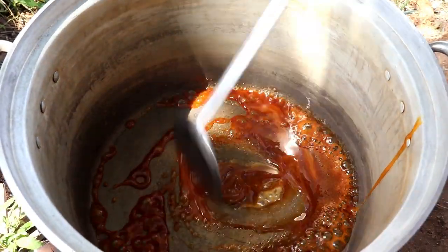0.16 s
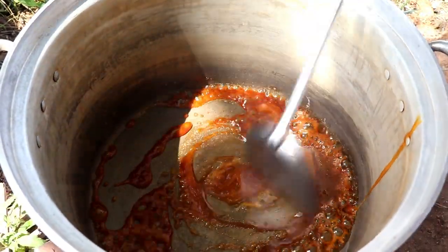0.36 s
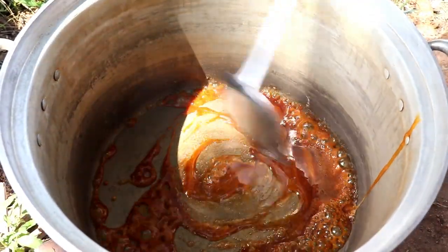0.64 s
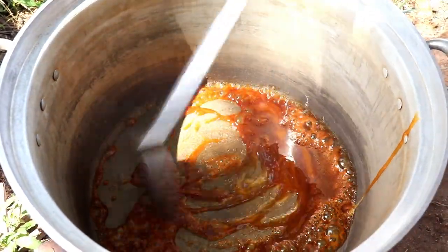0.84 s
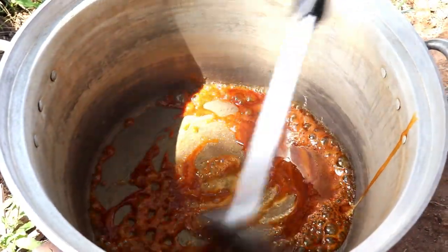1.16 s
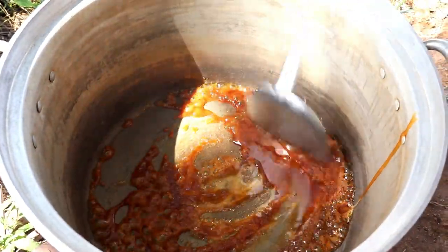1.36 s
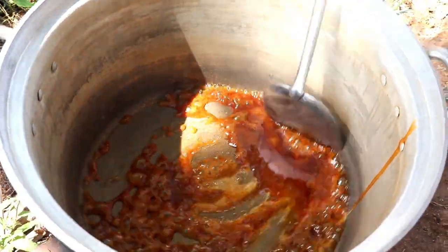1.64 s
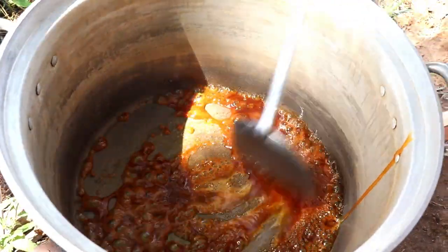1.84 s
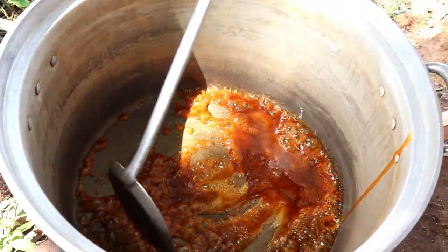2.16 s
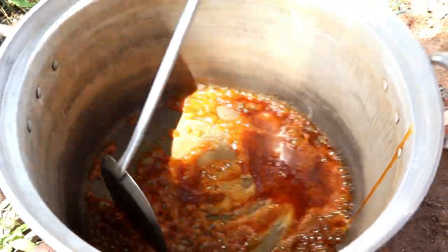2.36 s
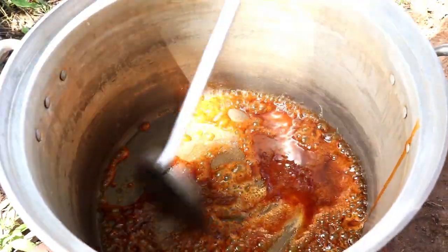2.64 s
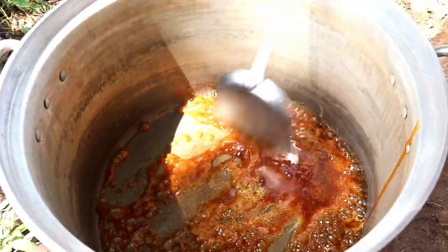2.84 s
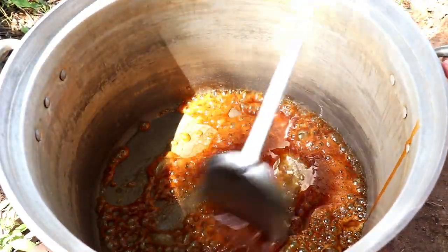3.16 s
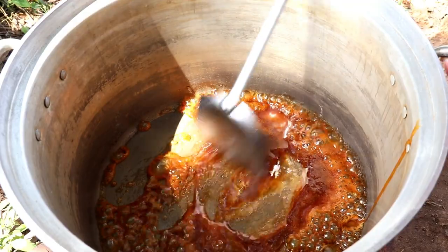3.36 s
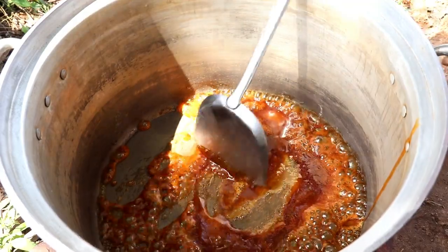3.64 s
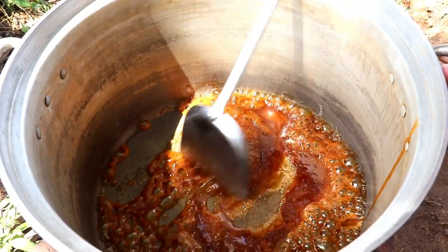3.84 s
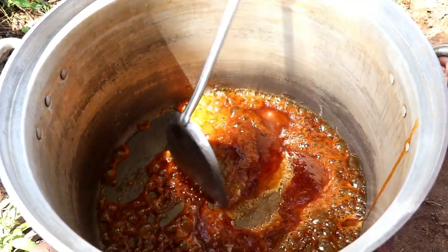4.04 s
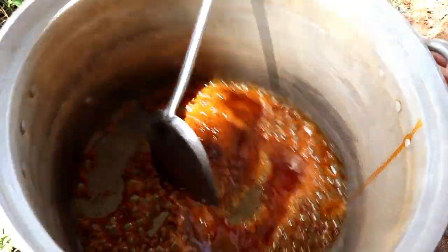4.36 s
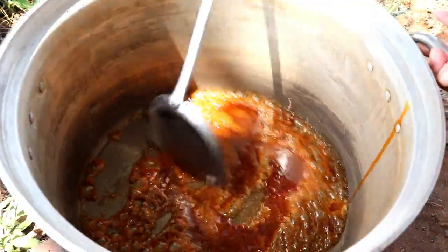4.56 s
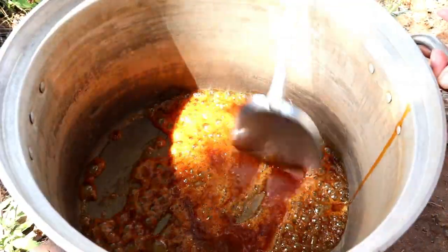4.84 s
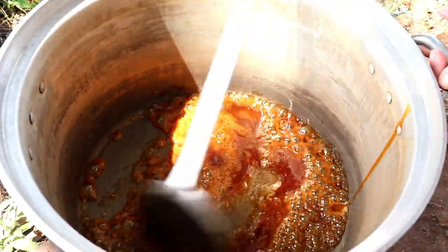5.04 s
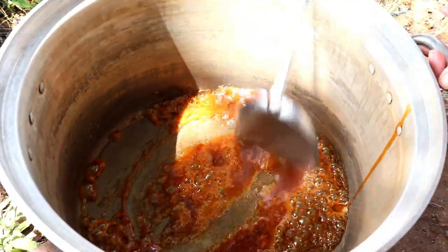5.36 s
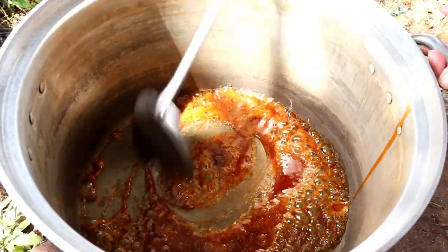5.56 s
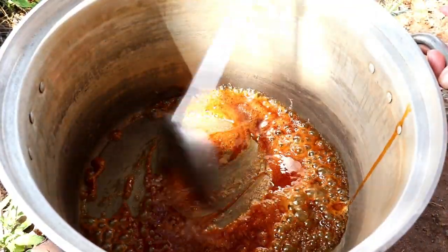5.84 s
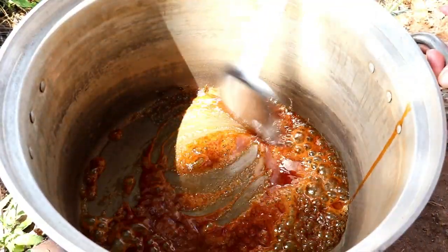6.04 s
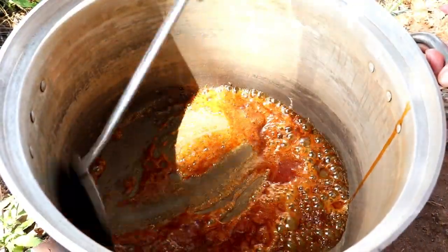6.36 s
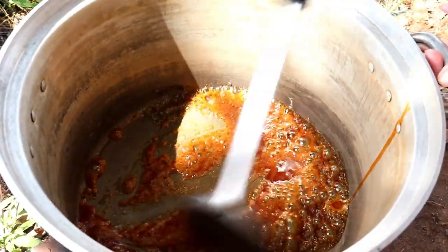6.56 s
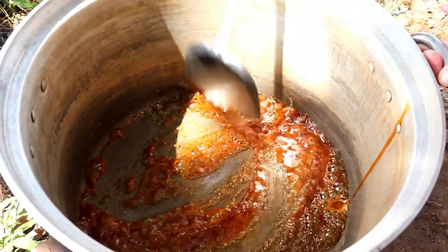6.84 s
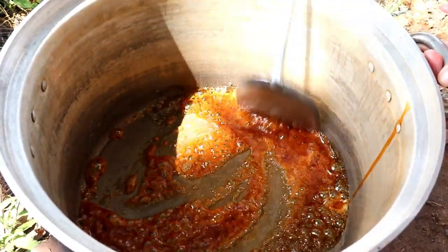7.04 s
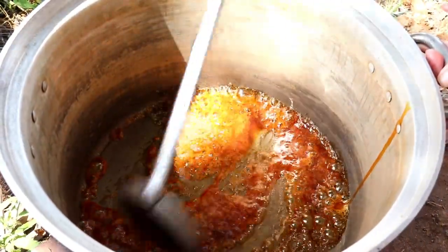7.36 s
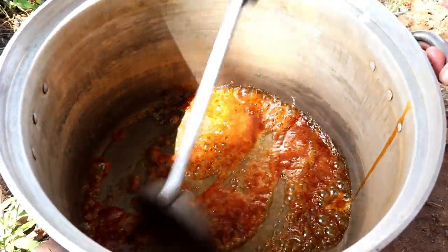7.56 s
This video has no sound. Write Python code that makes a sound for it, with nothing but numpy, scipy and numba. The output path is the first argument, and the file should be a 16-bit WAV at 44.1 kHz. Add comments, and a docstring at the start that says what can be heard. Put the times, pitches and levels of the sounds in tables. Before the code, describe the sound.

Close up and outdoors, a metal ladle scrapes round a big metal pot in quick, uneven strokes, two or three a second, knocking on the bottom and wall as it goes. The scrapes are raspy and slightly squeaky with a hollow groan beneath, and the hardest blows briefly overload the small microphone. Underneath, hot syrup sizzles and simmers, strongest at the start and slowly dying down, while light wind touches the microphone.

```python
"""A steel ladle stirs sizzling sugar syrup in a wide aluminium pot, outdoors, heard from close by.
Its edge scrapes the bottom in short strokes and knocks on bottom and wall; the pot booms and rings.
Underneath, tiny bursting bubbles hiss, larger ones colour the hiss and thick ones simmer low.
The small microphone stands in light wind, turns itself down after loud moments
and overloads on the hardest blows."""
import sys
import numpy as np
from scipy import signal
from scipy.fft import rfft, irfft, next_fast_len
from scipy.io import wavfile
from scipy.ndimage import uniform_filter1d
from numba import njit

SR = 44100
rng = np.random.default_rng(int(sys.argv[2]) if len(sys.argv) > 2 else 0)


def dump(signal):
    """Clip the signal to [-1, 1] and save it as 16-bit WAV at the path in sys.argv[1]."""
    limited = np.clip(np.atleast_2d(signal).T, -1, 1)
    pcm = np.round(limited * 32767).astype(np.int16)
    wavfile.write(sys.argv[1], SR, pcm)


N = 339129

# light wind on the microphone: t/s, level/dB
GUSTS = [(0.0, -46), (0.21, -44), (2.48, -39), (2.74, -43), (3.1, -36), (3.51, -45), (4.05, -43),
         (4.22, -41), (5.01, -38), (5.7, -51), (6.83, -41.5), (7.69, -40)]
# the syrup dying down: t/s, sizzle/dB, larger bubbles/dB, low simmer/dB
SYRUP_LEVELS = [(0, -26, -30.5, -32), (1.5, -28, -32, -36), (2.4, -31, -35, -40), (3.3, -31.5, -34, -35),
                (4.5, -34.5, -35, -37), (6, -34.5, -37, -41), (7.7, -35.5, -50, -40.5)]
# spectra of wind, syrup and the rasping edge: f/Hz, relative level/dB per Hz
WIND_SPECTRUM = [(12, -25), (25, -8), (60, 0.5), (110, -9.5), (150, -22), (250, -40)]
SIZZLE_SPECTRUM = [(260, -39), (450, -13), (589, -13), (616, -19), (843, -3.5), (908, -11), (950, -11.5),
                   (1220, -12.5), (1700, -6), (2160, -6.5), (4300, -6.5), (6060, -10.5), (9070, -12),
                   (16000, -31.5)]
BUBBLE_SPECTRUM = [(700, -24), (1100, -3), (1350, 0), (1750, -0.5), (2100, -18), (3000, -17)]
SIMMER_SPECTRUM = [(60, -21), (110, -2), (259, 0.5), (299, 5.5), (381, -2.5), (426, -4), (600, -8.5),
                   (780, -41), (1000, -80)]
RASP_SPECTRUM = [(650, -38), (1100, -6.5), (1570, -11.5), (1970, 0.5), (2760, -6), (3610, -3), (4080, 6),
                 (4940, 0), (5400, 4.5), (6110, -3), (8450, -6), (14100, -24), (16000, -66)]
# modes of the syrup-damped bottom, wall, ladle blade and free rim: f/Hz, relative level/dB, t60/s
BOTTOM_MODES = [(135, 0.5, 0.082), (186.4, -8, 0.2), (213.5, -5.5, 0.17), (244, 4, 0.09), (304.7, -2, 0.1),
                (348, 4.5, 0.089), (417.6, -1, 0.072)]
WALL_MODES = [(853, -29, 0.14), (838.6, 8, 0.038), (983, 10, 0.024), (1217, -3, 0.048),
              (1407, 19.5, 0.0079)]
BLADE_MODES = [(1662, -2.5, 0.029), (1808, 0, 0.027), (2066, -23, 0.0085), (2510, -9.5, 0.017),
               (2600, -28, 0.0083), (2848, -5, 0.056), (3306, 5.5, 0.011), (3550, -12, 0.021),
               (3997, -4, 0.038), (4240, -24, 0.067), (4560, -3, 0.066), (4796, -2.5, 0.075),
               (5280, -7.5, 0.085), (5476, -5.5, 0.052), (6400, -18, 0.018), (7070, -6.5, 0.067),
               (7690, -10.5, 0.027), (8260, -12.5, 0.11), (10700, -23, 0.014), (12600, -28, 0.014)]
RIM_MODES = [(764, -6.5, 0.59), (792, -16, 0.4), (817, -11.5, 0.7), (867, -18, 0.64), (1720, -16, 0.53)]
# strokes of the edge over the bottom, one curve each: t/s, rasp/dB, boom/dB
STROKES = [
    [(0.03, -48, -30), (0.084, -20.5, -18.5), (0.114, -41, -36), (0.154, -19.5, -20), (0.166, -35, -28),
     (0.228, -22.5, -9.5), (0.255, -40, -36)],
    [(0.255, -33, -31), (0.285, -13.5, -17), (0.311, -14.5, -20), (0.355, -26, -15.5), (0.409, -16, -20.5),
     (0.443, -15.5, -28), (0.465, -42, -31)],
    [(0.47, -35, -21), (0.49, -18.5, -19.5), (0.518, -33, -33), (0.538, -16.5, -16), (0.55, -38, -24),
     (0.606, -26.5, -32), (0.62, -33, -19)],
    [(0.66, -37, -23), (0.67, -22.5, -11), (0.684, -17.5, -22), (0.694, -30.5, -17.5), (0.746, -20.5, -22),
     (0.768, -27, -19.5), (0.79, -33, -22)],
    [(1.06, -25, -22), (1.084, -32, -28), (1.106, -24, -12), (1.17, -22.5, -7.5), (1.236, -9, -29),
     (1.29, -20.5, -21), (1.3, -54, -46)],
    [(1.6, -21, -10), (1.62, -32, -11), (1.628, -33.5, -21), (1.734, -29, -10.5), (1.754, -22, -15),
     (1.77, -25, -11)],
    [(2.32, -39, -36), (2.338, -29.5, -29), (2.378, -34.5, -21), (2.494, -29, -6.5), (2.522, -56, -4.5),
     (2.58, -48, -43)],
    [(2.66, -52, -28), (2.682, -27, -28), (2.714, -20, -11), (2.722, -23.5, -16.5), (2.772, -45, -39),
     (2.78, -37.5, -42)],
    [(3.14, -21.5, -23), (3.174, -14, -19), (3.19, -39, -28), (3.198, -39, -33), (3.234, -31, -22.5),
     (3.27, -38, -37)],
    [(3.46, -45, -13), (3.53, -37.5, -42), (3.562, -32, -16.5), (3.612, -34, -25), (3.622, -27, -20),
     (3.69, -32, -16)],
    [(3.72, -19, -8.5), (3.786, -49, -17), (3.818, -31, -8.5), (3.844, -42, -9.5), (3.98, -36, -22.5),
     (4.01, -44, -38)],
    [(4.2, -31.5, -16), (4.268, -33, -28.5), (4.296, -36, -19), (4.334, -32.5, -20.5), (4.476, -39, -18.5),
     (4.5, -44, -31)],
    [(5.0, -30.5, -22), (5.066, -18.5, -18), (5.092, -36.5, -22), (5.116, -21, -23), (5.13, -30.5, -17),
     (5.182, -20, -28), (5.188, -26, -32), (5.208, -22, -15.5), (5.255, -29, -30)],
    [(5.26, -33, -25), (5.27, -15.5, -25), (5.292, -28.5, -24), (5.348, -20.5, -30), (5.364, -30, -26),
     (5.386, -18.5, -23.5), (5.442, -14.5, -30), (5.498, -21.5, -16.5), (5.62, -23, -29)],
    [(5.62, -24, -29), (5.682, -23, -18.5), (5.726, -18, -37), (5.742, -33, -29), (5.776, -13, -23),
     (5.802, -16, -24), (5.82, -13, -33), (5.86, -24, -25), (5.93, -23.5, -30)],
    [(5.93, -33, -29), (5.94, -27, -33), (6.004, -23.5, -31), (6.036, -26, -23), (6.072, -19, -37),
     (6.098, -27, -27), (6.158, -14.5, -20), (6.208, -17, -36), (6.24, -27, -38)],
    [(6.25, -28, -23), (6.264, -16.5, -28), (6.3, -17, -28), (6.325, -42, -35)],
    [(6.43, -55, -33), (6.526, -17.5, -19.5), (6.618, -17, -25), (6.654, -22, -30), (6.678, -17.5, -37),
     (6.73, -16, -32.5), (6.762, -43, -27), (6.79, -33, -38)],
    [(7.14, -46, -19), (7.168, -15, -15), (7.188, -11, -24), (7.2, -35, -6)],
    [(7.43, -41, -39), (7.44, -45, -36), (7.506, -45, -28), (7.51, -37, -17)],
    [(7.55, -41, -12), (7.582, -12, -38), (7.64, -13.5, -24), (7.665, -60, -25)],
]
# the pot's answer to each stroke: groan at start/Hz, groan at end/Hz, wall gain/dB
STROKE_TONES = [(400, 430, -0.5), (387, 260, -5), (327.2, 350, -13), (198.3, 290, 2.5), (290, 330, -6.5),
                (240.35, 310, -4), (288.8, 305, -9), (299.4, 300, -4), (255.3, 290, -6.5), (242.3, 490, 0),
                (214.2, 250, 1), (213.2, 218, -3.5), (370, 500, -3.5), (246, 340, -8), (244.5, 420, -9.5),
                (281.5, 270, -7), (372.4, 340, -12), (360, 300, -12), (292, 220, -7), (268, 150, -12),
                (238, 240, -26)]
# ladle on pot, relative levels: t/s, thud/Hz, thud/dB, wall/dB, clank/dB, ring/dB
KNOCKS = [(0.14, 349, -7, -15, 3.5, -40), (0.482, 380, -11, -16, 8, -16), (0.531, 320, -13, -16, 8, -38),
          (0.574, 303, -28, -8.5, -3, -37), (0.634, 196, 1, 6, 2, -25), (0.682, 410, -9, 0.5, -17, -35),
          (1.022, 306, 1.5, -25, 0, -17), (1.287, 190, -8, 5, -25, -26), (1.564, 342, -5.5, -33, 15.5, -15),
          (1.593, 243, -0.5, -8, -17, -38), (1.775, 295, 18, 14, -19, -10), (2.3, 203, -13, -28, -4, -45),
          (2.612, 304, 7.5, 5, -32, -31), (2.713, 346, -7.5, 4.5, -26, -40),
          (3.029, 276, 16, 15.5, -15, -17), (3.141, 270, -3, -5, -9, -37),
          (3.227, 383, -5.5, -0.5, -21, -30), (3.437, 212, -1, -18, -10, -23),
          (3.627, 353, -10, -23, -13, -37), (3.7, 370, -0.5, 1, 20.5, -5.5),
          (3.821, 312, 6.5, -11, -28, -38), (4.2, 230, -12, -7, -22, -43),
          (4.606, 255.4, 18.5, 22.5, 12.5, 0), (4.856, 340, 0, 1, -40, -8), (4.912, 261, 13.5, 17, 2, -38),
          (4.99, 313, 2.5, -18, 4, -38), (5.179, 199, -11, 5, -23, -40), (5.205, 334, -8, 4, -31, -34),
          (5.271, 225, -15, -30, 6, -42), (5.288, 235, -11, 7.5, -19, -43),
          (5.617, 228, -41, -3.5, -3, -34), (5.656, 252, -25, 3, 2.2, -41), (5.677, 380, -11, 6, -22, -40),
          (5.763, 390, -22, 0, -11, -23), (5.97, 348, -28, 1, -20, -38), (5.988, 348, -27, -18, -17, -42),
          (6.018, 367.5, -16, -1.5, -3, -9), (6.161, 250, -19.5, -1, -10, -41),
          (6.259, 272, -11.5, -22, 0, -36), (6.375, 232, -13, -16, 18, -11),
          (6.403, 361, -1.5, -0.5, -12, -36), (6.597, 390, -10.5, 2, -1, -18),
          (7.096, 291, 9, 11.5, -24, -15), (7.21, 279, 11.5, -10, -26, -19),
          (7.527, 274, 14.5, -6, 16, -38), (7.64, 326, -5.5, -2.5, 11, -33)]


def from_db(db):
    """Gain of a level in dB."""
    return 10 ** (np.asarray(db) / 20)


def rms_one(x):
    """Scaled to rms 1."""
    return x / np.sqrt(np.mean(x ** 2) + 1e-20)


def drift(rate_hz, flicker_db=None):
    """Slow noise of spread 1; or, given a spread in dB, a flickering gain."""
    step, settle = 40, 2000    # samples per slow value; slow values dropped while the filter settles
    pole = np.exp(-2 * np.pi * rate_hz * step / SR)
    noise = rng.standard_normal(N // step + settle + 2)
    slow = rms_one(signal.lfilter([1], [1, -2 * pole, pole * pole], noise)[settle:])
    if flicker_db is not None:
        slow = from_db(flicker_db * slow)
    return np.interp(np.arange(N) / step, np.arange(len(slow)), slow)


def ring(clicks, hz, t60):
    """A unit click sets a decaying sine of height 1 ringing."""
    r, w = from_db(-60 / (t60 * SR)), 2 * np.pi * hz / SR
    return signal.lfilter([0, np.sin(w)], [1, -2 * r * np.cos(w), r * r], clicks + 1e-18)


def grains(per_s, spread_db):
    """Random clicks of very uneven size; rms 1."""
    sizes = from_db(spread_db * np.minimum(rng.exponential(1, N), 5)) * rng.choice([-1, 1], N)
    return rms_one(sizes * (rng.random(N) < per_s / SR))


def coloured(white, spectrum, patchy_db, rate_hz):
    """Shapes white input to a spectrum at equal power, then lets each half-octave band flicker."""
    hz, level_db = np.transpose(spectrum)
    size = next_fast_len(N)
    octave = np.log2(np.arange(1, size // 2 + 2) * SR / size)
    shape = from_db(np.interp(octave, np.log2(hz), level_db))
    shaped = rfft(white, size) * shape / np.sqrt(np.mean(shape ** 2))
    centres = np.arange(np.log2(hz[0]), np.log2(hz[-1]) + .5, .5)
    bands = (irfft(shaped * np.clip(1 - 2 * abs(octave - c), 0, 1), size)[:N] for c in centres)
    return sum(band * drift(rate_hz, flicker_db=patchy_db) for band in bands)


def driven(force, modes, wander_db):
    """A rough force shakes all modes; the contact point moves, so their shares wander."""
    power_gain = sum(from_db(2 * db) * t60 * SR / (4 * np.log(1000)) for hz, db, t60 in modes)
    ringing = sum(from_db(db) * ring(force * drift(10.5, flicker_db=wander_db), hz, t60)
                  for hz, db, t60 in modes)
    return ringing / np.sqrt(power_gain)


def knock_clicks(level_db):
    """One click at each knock, at the given levels."""
    clicks = np.zeros(N)
    clicks[(np.array(KNOCKS)[:, 0] * SR).astype(int)] = from_db(level_db)
    return clicks


def struck(level_db, modes, uneven_db=3.5):
    """Every knock strikes each mode with a strength of its own."""
    return sum(ring(knock_clicks(level_db + db + uneven_db * rng.standard_normal(len(KNOCKS))), hz, t60)
               for hz, db, t60 in modes)


def wind():
    """Lumpy low rumble right at the microphone port."""
    times, level_db = np.transpose(GUSTS)
    rumble = rms_one(coloured(rng.standard_normal(N), WIND_SPECTRUM, patchy_db=-5.5, rate_hz=6))
    return from_db(np.interp(np.arange(N) / SR, times, level_db)) * rumble


def syrup():
    """Thousands of tiny bursts a second merge into a hiss; larger bubbles colour it, thick ones simmer."""
    times, *levels_db = np.transpose(SYRUP_LEVELS)
    sizzle = coloured(grains(14000, spread_db=2.5), SIZZLE_SPECTRUM, patchy_db=2, rate_hz=8.6)
    bubbles = coloured(grains(2500, spread_db=4), BUBBLE_SPECTRUM, patchy_db=2.5, rate_hz=6.7)
    simmer = coloured(rng.standard_normal(N), SIMMER_SPECTRUM, patchy_db=2, rate_hz=5.8)
    return sum(from_db(np.interp(np.arange(N) / SR, times, db)) * layer
               for db, layer in zip(levels_db, (sizzle, bubbles, simmer)))


def strokes():
    """The edge lands, drags and lifts: envelopes of rasp, boom and wall force, and the groan's pitch."""
    edge_s = 0.0069    # time to land or lift
    rasp, boom, wall, pitch_hz = np.zeros((4, N))
    for curve, (first_hz, last_hz, wall_db) in zip(STROKES, STROKE_TONES):
        times, rasp_db, boom_db = np.transpose(curve)
        a, b = int(times[0] * SR), int(times[-1] * SR)
        t = np.arange(a, b) / SR
        contact = np.clip(np.minimum(t - times[0], times[-1] - t) / edge_s, 0, 1)
        rasp[a:b] = contact * from_db(np.interp(t, times, rasp_db))
        boom[a:b] = contact * from_db(np.interp(t, times, boom_db))
        wall[a:b] = from_db(wall_db) * rasp[a:b] ** .95
        pitch_hz[a:b] = np.linspace(first_hz, last_hz, b - a)
        pitch_hz[b:] = last_hz
    return rasp, boom, wall, pitch_hz


def squeak(grit):
    """The grit excites a resonance that shifts as the edge moves over the bottom."""
    centre_hz, width_hz, wander_octaves = 1600, 200, .22
    phase = 2 * np.pi * np.cumsum(centre_hz * 2 ** (wander_octaves * drift(6))) / SR
    pole = np.exp(-np.pi * width_hz / SR)
    envelope = signal.lfilter([np.sqrt(2 - 2 * pole * pole)], [1, -pole], grit * np.exp(-1j * phase))
    return np.real(envelope * np.exp(1j * phase))


def groan(boom, pitch_hz):
    """The rubbed bottom groans, a narrow unsteady tone: two slow noises in quadrature on a glide."""
    wavering_hz = pitch_hz * (1 + .03 * drift(9.6))
    phase = 2 * np.pi * np.cumsum(wavering_hz) / SR
    tone = (1.3 + drift(12)) * np.cos(phase) + drift(12) * np.sin(phase)
    return uniform_filter1d(boom, size=400) * tone


def scraping():
    """The edge catches on sugar grit: dense clicks rasp, sing in the blade and shake wall and bottom."""
    rasp, boom, wall_force, pitch_hz = strokes()
    chatter = drift(68, flicker_db=2.2)    # the edge sticks and slips
    grit = rasp * chatter * grains(12000, spread_db=3.5)
    hiss = coloured(grit, RASP_SPECTRUM, patchy_db=3, rate_hz=18.6)
    pressed_modes = [(hz, db, t60 * .45) for hz, db, t60 in BLADE_MODES]    # pressed down, it rings shorter
    blade = from_db(-5) * driven(grit, pressed_modes, wander_db=5)
    cushion = signal.butter(2, 450, fs=SR, output="sos")    # syrup softens the contact
    rub = signal.sosfilt(cushion, boom * grains(900, spread_db=2.5))
    squeaking = from_db(-8) * squeak(grit)
    wall = driven(wall_force * chatter * grains(2500, spread_db=4), WALL_MODES, wander_db=-5)
    bottom = from_db(-0.5) * driven(rub, BOTTOM_MODES, wander_db=6)
    return hiss + blade + squeaking + wall + bottom + from_db(-3) * groan(boom, pitch_hz)


def push():
    """A hard blow shoves the whole pot: one deep puff."""
    thud_db = np.array(KNOCKS)[:, 2]
    return ring(knock_clicks(thud_db - 26.5), hz=78, t60=0.084)


def pot_song():
    """Rim and belly of the free pot sing on after a blow until the next knock damps them."""
    belly_hz, belly_t60_s, damping_s, grip_at_s = 210, 0.94, 0.04, 3.5
    times, ring_db = np.transpose(KNOCKS)[[0, 5]]
    uneven_db = 3.1 * rng.standard_normal((len(times), len(RIM_MODES)))
    out = np.zeros(N)
    for start, stop, level_db, offsets_db in zip(times, [*times[1:], N / SR], ring_db, uneven_db):
        a, b = int(start * SR), min(int((stop + damping_s) * SR), N)
        t = np.arange(b - a) / SR
        belly_db = level_db + (-0.5 if start < grip_at_s else -54)    # a hand on the pot mutes the belly
        modes = [(hz, level_db + db + offset, t60) for (hz, db, t60), offset in zip(RIM_MODES, offsets_db)]
        modes.append((belly_hz, belly_db, belly_t60_s))
        fade = np.clip((stop - start - t) / damping_s + 1, 0, 1)
        out[a:b] += fade * sum(from_db(db - 60 * t / t60) * np.sin(2 * np.pi * hz * t)
                               for hz, db, t60 in modes)
    return out


def knocks():
    """Each blow: a dull thud of bottom and wall through the syrup, a crack and a ping of the blade."""
    thud_t60_s, crack_t60_s, contact_s = 0.057, 0.045, 0.00029
    times, thud_hz, thud_db, wall_db, clank_db = np.transpose(KNOCKS)[:5]
    t = np.arange(int(.12 * SR)) / SR
    thuds, crack_envelope = np.zeros((2, N + SR))
    for at, hz, low_db, high_db in zip((times * SR).astype(int), thud_hz, thud_db, clank_db):
        thuds[at:at + len(t)] += from_db(low_db - 60 * t / thud_t60_s) * np.sin(2 * np.pi * hz * t)
        crack_envelope[at:at + len(t)] += from_db(high_db - 21 - 60 * t / crack_t60_s)
    pot = thuds[:N] + struck(thud_db - 15, BOTTOM_MODES) + struck(wall_db - 18.5, WALL_MODES) + pot_song()
    pole = np.exp(-1 / (contact_s * SR))    # the cushioned contact lasts a moment and dulls the blow
    dull = signal.lfilter([1 - pole], [1, -pole], pot)
    noise = coloured(rng.standard_normal(N), RASP_SPECTRUM, patchy_db=2, rate_hz=30)
    cracks = signal.sosfilt(signal.butter(2, 9000, fs=SR, output="sos"), crack_envelope[:N] * noise)
    return dull + cracks + struck(clank_db - 24, BLADE_MODES)


def scene():
    """All sources reach one close microphone; the ringing pot is too small to radiate deep bass."""
    radiation = signal.butter(3, 212, "high", fs=SR, output="sos")
    return (syrup() + wind() + push() + signal.sosfilt(radiation, scraping() + knocks()))[None]


@njit
def gain_control(x, threshold_db, slope, listen_s, attack_s, release_s):
    """The output clips at full scale; its power above the threshold turns the input down."""
    out, power, cut_db = np.empty_like(x), 0., 0.
    for i in range(len(x)):
        out[i] = min(max(x[i] * 10 ** (-cut_db / 20), -1.), 1.)
        power += (out[i] ** 2 - power) / (listen_s * SR)
        wanted_db = slope * max(10 * np.log10(power + 1e-9) - threshold_db, 0.)
        lag_s = attack_s if wanted_db > cut_db else release_s
        cut_db += (wanted_db - cut_db) / (lag_s * SR)
    return out


def record(dry):
    """The small microphone: a treble dip from its port, gain control with hard overload, a cut top."""
    dip_hz, dip_width_hz, dip_share, cutoff_hz = 6280, 2000, 0.53, 16100
    port_band = signal.iirpeak(dip_hz, dip_hz / dip_width_hz, fs=SR)
    heard = dry[0] - dip_share * signal.lfilter(*port_band, dry[0])
    held = gain_control(heard, threshold_db=-19.5, slope=1.36, listen_s=.052, attack_s=.017, release_s=.033)
    return signal.sosfilt(signal.cheby2(18, 70, cutoff_hz, fs=SR, output="sos"), held)[None]


dry = scene()
out = record(dry)
dump(out)
```